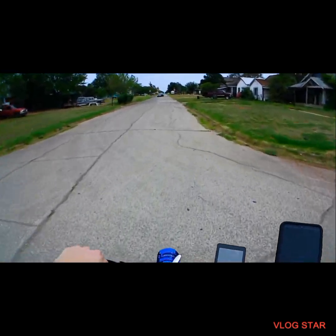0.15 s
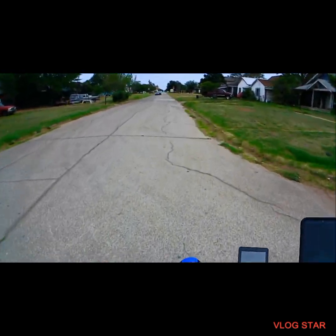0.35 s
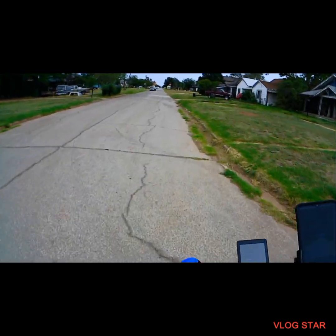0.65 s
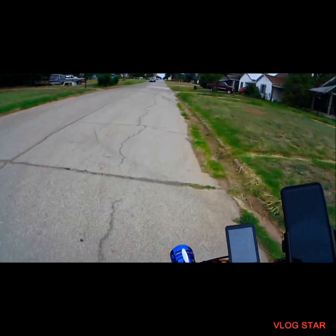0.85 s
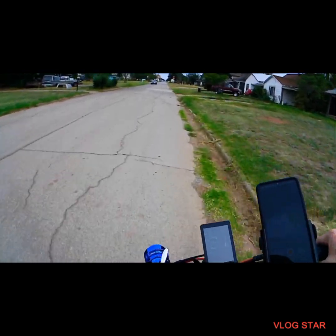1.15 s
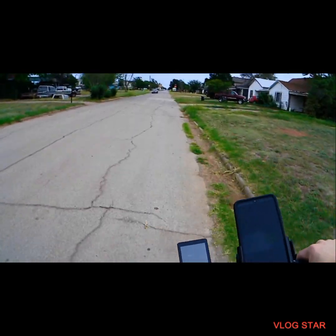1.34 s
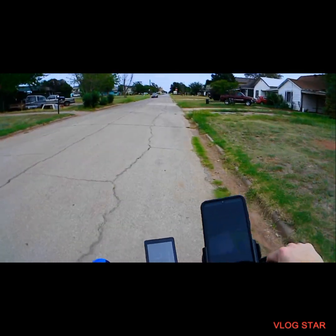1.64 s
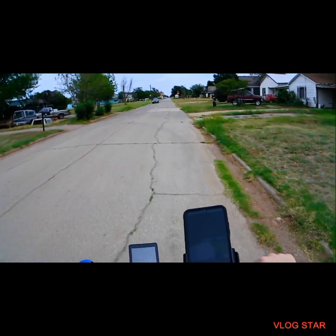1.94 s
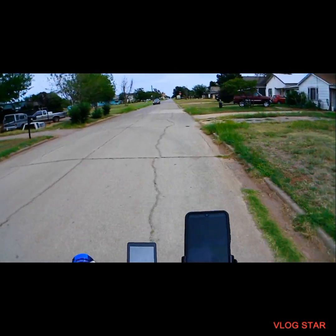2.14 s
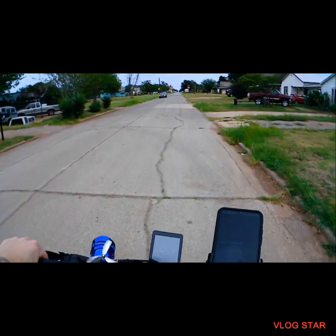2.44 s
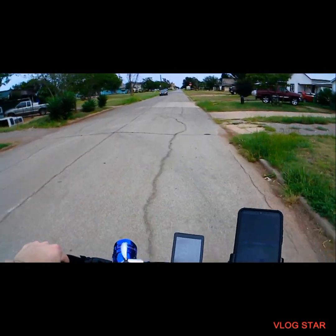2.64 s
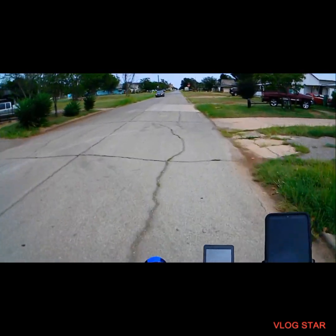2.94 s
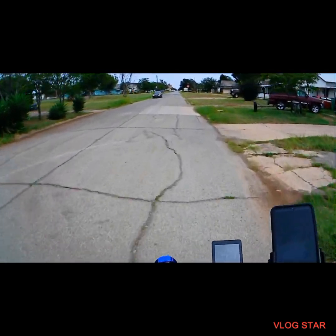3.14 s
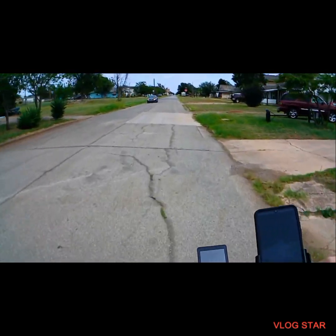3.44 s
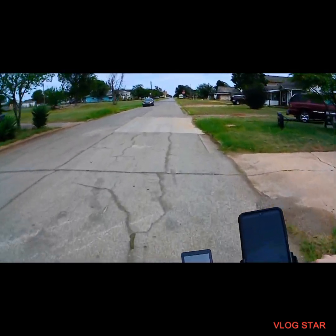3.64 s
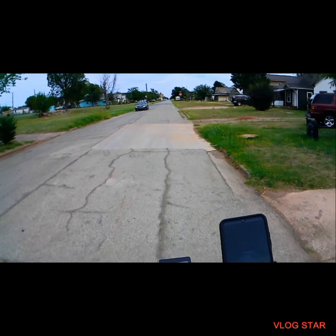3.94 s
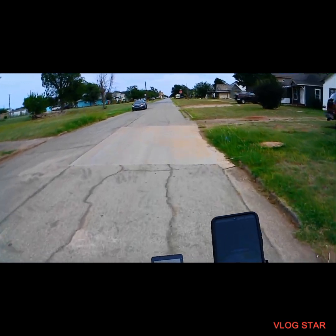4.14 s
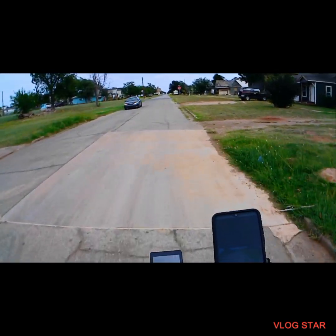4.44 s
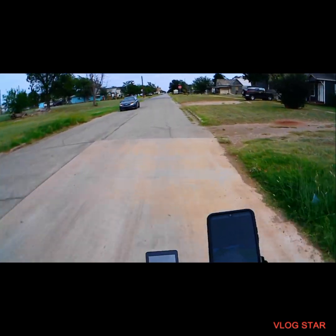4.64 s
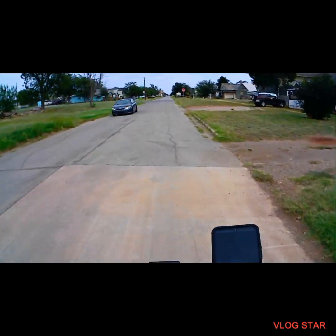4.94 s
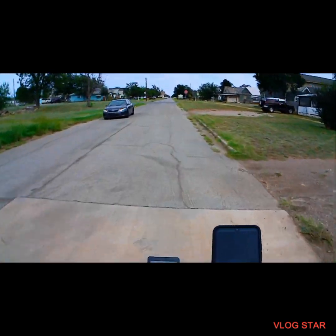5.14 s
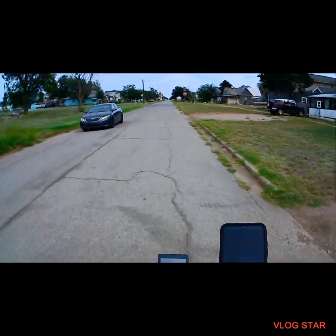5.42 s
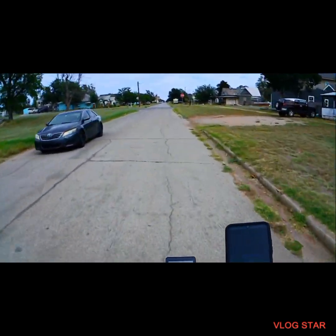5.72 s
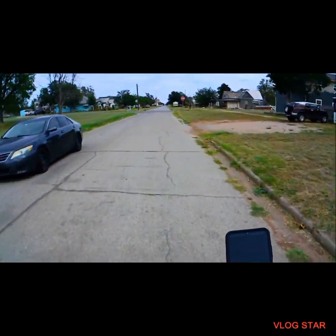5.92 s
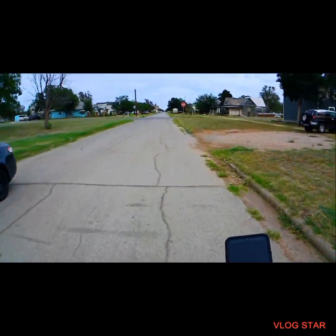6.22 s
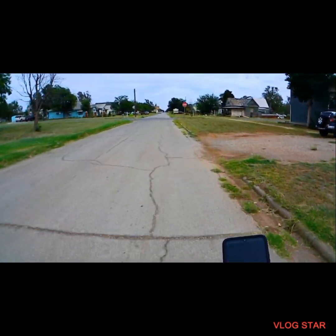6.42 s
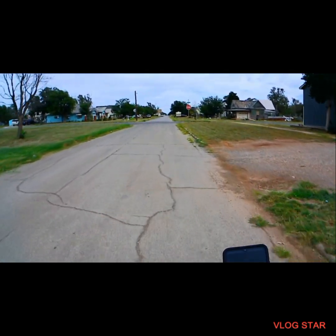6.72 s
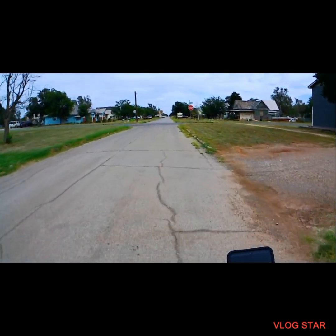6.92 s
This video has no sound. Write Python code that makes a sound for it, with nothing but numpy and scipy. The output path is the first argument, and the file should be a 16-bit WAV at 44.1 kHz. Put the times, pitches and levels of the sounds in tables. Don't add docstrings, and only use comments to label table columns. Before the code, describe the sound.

Close, mono outdoor sound from a rider's chest: an electric hub motor hums in a slowly rising mid-low tone under gusty, fluttering wind. Tyres roar and hiss over cracked concrete, with clusters of dull knocks around one second and again near six. Small grit ticks hit the frame, a loose part jingles faintly after four seconds, and a far bird gives short falling chips. An oncoming car's tyre noise blends in late, then drops away.

```python
import sys
import numpy as np
from scipy import signal
from scipy.fft import rfft, irfft, next_fast_len
from scipy.io import wavfile
from scipy.ndimage import uniform_filter1d, map_coordinates

SR = 44100
rng = np.random.default_rng(int(sys.argv[2]) if len(sys.argv) > 2 else 0)


def natural_amplitude(level_db):
    exponent = np.asarray(level_db, float) / 20
    return 10 ** exponent


def inscribe(sig):
    pcm = np.round(np.clip(np.atleast_2d(sig).T, -1, 1) * 32767)
    wavfile.write(sys.argv[1], SR, pcm.astype(np.int16))


N = 311787

# time in seconds, pitch in Hz, level in dB.
MOTOR_HUM = [(0, 334, -42), (.25, 336, -33.5), (.75, 337.8, -34), (1.25, 351.4, -33), (1.74, 361.5, -37),
             (2.02, 349, -33), (2.45, 370, -38), (2.9, 376, -38), (3.5, 371, -33), (3.82, 369.5, -27.5),
             (4.2, 376, -34), (4.42, 366.5, -33.5), (4.95, 377.5, -31.5), (5.8, 380.5, -35.5),
             (6.3, 386, -30.5), (6.6, 386, -36), (6.76, 389, -27), (7.07, 399.5, -26.5)]
# time in seconds, level in dB.
SIDE_ORDER = [(0, -48.5), (1.3, -43), (1.75, -41), (2, -46), (2.4, -41), (3, -40), (3.5, -41), (4, -44),
              (4.2, -38), (4.5, -45), (5, -38), (5.4, -43), (5.75, -35.5), (6.1, -40), (6.5, -44),
              (7.07, -44)]
# time in seconds, level in dB.
WHINE_LOAD = [(0, -50), (.35, -52), (.5, -66), (5.15, -62), (5.3, -51), (5.45, -62), (6.6, -58), (6.7, -46),
              (6.86, -44), (7.07, -44.5)]
# multiple of the hum's pitch, level in dB.
WHINE_ORDERS = [
    (3, -5),
    (4, -12),
    (4.5, 0),
]

# time in seconds, strength in dB.
HEAD_WIND = [(0, -39.5), (.4, -36), (.75, -32.5), (1.4, -32.5), (1.6, -35.5), (1.85, -36.5), (2.4, -35),
             (2.8, -33.5), (3.2, -30), (3.6, -30.5), (4.1, -29.5), (4.6, -28), (5.1, -30), (5.35, -29.5),
             (5.6, -29.5), (6.2, -29.5), (6.6, -25.5), (6.95, -33), (7.07, -25)]
# peak in seconds, half length in seconds, strength in dB, extra brightness in dB.
GUSTS = [(0.115, 0.26, 8, -1), (0.503, 0.037, 8, 2.5), (0.623, 0.069, 6, 1.5), (1.003, 0.14, 5.5, 3.5),
         (1.127, 0.09, 4.5, 9), (1.245, 0.075, 5, 5), (1.542, 0.043, -2, 8), (2.138, 0.21, 1.5, 6.5),
         (2.553, 0.19, 4, -4.5), (2.977, 0.11, 7.5, -0.5), (3.13, 0.041, 4.5, -0.5),
         (3.647, 0.048, 5.5, -1.5), (3.788, 0.068, 1.5, 5), (3.894, 0.22, 3, 4), (4.163, 0.052, 3, 3.5),
         (4.367, 0.12, 0.5, 3.5), (4.524, 0.048, 1.5, 3), (4.81, 0.1, 2.5, 1), (4.962, 0.086, 2.5, -1.5),
         (5.326, 0.1, 0, 5.5), (5.418, 0.069, 3.5, -1.5), (5.542, 0.084, 3.5, -3), (5.744, 0.03, 7, -8.5),
         (5.84, 0.21, 1.5, 3), (6.085, 0.13, 5.5, -1), (6.322, 0.084, 3, 4.5), (6.45, 0.12, 0, 6.5),
         (6.779, 0.037, 3, 1), (6.892, 0.058, 4, -6.5), (7.028, 0.1, 2, -4.5)]
# time in seconds, level of its upper part in dB.
UPPER_BUFFET = [(0, 0.5), (.3, 0.5), (.7, 0.5), (1.1, 2.5), (1.5, 0), (1.9, 1.5), (2.4, 1), (2.9, -1),
                (3.4, -0.5), (3.9, 1.5), (4.3, -3), (4.65, -3.5), (5.2, -1), (5.5, -1), (5.9, -0.5),
                (6.4, -1), (6.8, 0), (7.07, -5)]
# time in seconds, coarseness in dB.
COARSENESS = [(0, -6.5), (.4, -5), (.8, -2), (1.5, 0), (1.7, -5), (2.8, -4), (3.2, 2), (3.7, 1.5), (4.1, 5),
              (4.45, 1.5), (4.8, 7), (5.7, 6.5), (6.2, 4.5), (6.45, 3), (6.7, 1.5), (7.07, 0)]
# middle in seconds, half length in seconds, coarseness in dB.
ROUGH_PATCHES = [(.94, .05, 3), (1.23, .05, 1), (1.31, .03, 2.5), (3.66, .03, 3.5), (3.93, .07, 1),
                 (1.058, 0.13, 5.5), (1.5, .06, -2), (2.15, 0.071, 1), (3.012, .06, 3), (3.788, 0.036, 4),
                 (4.15, .1, 1.5), (4.302, 0.041, 4), (4.567, 0.13, 7), (4.766, 0.1, 3.5),
                 (5.259, 0.047, 4.5), (5.343, 0.051, 5), (5.737, 0.095, 5), (6.083, 0.028, 5),
                 (6.41, 0.093, 4), (7.07, 0.034, 6)]
# time in seconds, change of roar in dB.
TYRE_WEIGHT = [(0, -0.5), (.4, 1), (.8, 0), (1.1, 1.5), (1.4, -0.5), (1.6, 2), (1.9, -1), (2.4, 0), (3, 0),
               (3.6, 0), (4.2, 1), (4.8, 0), (5.4, 0), (6, 0), (6.5, 1), (6.72, -2.5), (6.9, -3.5),
               (7.07, -2)]

# frequency in Hz, density in dB per Hz.
BUFFET_COLOUR = [(12, -58), (20, -43), (48, -20), (145, -3), (278, -2), (338, -3.5), (386, -5), (468, -7.5),
                 (640, -20), (700, -20.5), (910, -29), (1540, -120)]
# frequency in Hz, density in dB per Hz.
RUSH_COLOUR = [(150, -41.5), (300, -5.5), (450, -2.5), (700, -3.5), (1000, -8.5), (1300, -20), (2000, -30),
               (4000, -63.5), (6000, -120)]
# frequency in Hz, density in dB per Hz.
SPRAY_COLOUR = [(1300, -36), (2000, -1), (2500, -2.5), (3100, -10), (4200, -14.5), (5000, -24), (6500, -32),
                (8000, -39.5), (10300, -53.5), (10600, -75)]
# frequency in Hz, density in dB per Hz.
ROAR_COLOUR = [(290, -39), (500, -2), (523, -16), (706, -11), (761, -8.5), (790, -3.5), (904, -3),
               (1130, -1.5), (1240, -2.5), (1780, -5.5), (2060, -15.5), (2240, -23), (3000, -32.5),
               (3900, -46.5), (6600, -120)]
# frequency in Hz, width in Hz, level in dB.
TYRE_MODES = [
    (1066, 160, -11),
    (1610, 210, -8),
]
# frequency in Hz, density in dB per Hz.
FLOOR_COLOUR = [(1500, -20), (2500, 2.5), (3500, -8.5), (4500, -10), (5500, -21.5), (7000, -20),
                (10350, -24), (10550, -46), (12500, -48), (16000, -60)]
# frequency in Hz, density in dB per Hz.
HISS_COLOUR = [(10300, -60), (10480, 0), (11000, -2), (11200, -60)]
# time in seconds, level in dB.
HISS_LEVEL = [(0, -90), (.28, -91), (.36, -84), (.46, -91), (.5, -130), (.68, -130), (.72, -90), (.8, -130),
              (1.28, -130), (1.34, -86), (2.9, -87), (3.12, -90), (3.16, -130), (7.07, -130)]

# frequency in Hz, width in Hz, level in dB.
JINGLE_MODES = [
    (8980, 90, 1.5),
    (9300, 600, 0),
    (10100, 900, -6.5),
]
# peak in seconds, half length in seconds, level in dB.
JOLTS = [
    (3.953, 0.37, -89),
    (4.235, 0.18, -74),
    (4.494, 0.13, -76.5),
    (4.8, 0.19, -75),
    (5.1, 0.22, -90),
    (6.302, .09, -76),
]
# start in seconds, peak in dB, ring in Hz.
CRACK_THUMPS = [(.081, -22, 490), (.589, -19, 330), (.644, -19, 627), (.9135, -20, 620), (.929, -18, 400),
                (1.031, -16, 484), (1.052, -17, 450), (1.068, -14, 400), (1.096, -16, 520),
                (1.121, -14, 420), (1.2, -16, 430), (1.241, -15, 430), (1.625, -26, 500), (2.938, -20, 455),
                (2.995, -19, 600), (3.762, -19, 440), (4.056, -20, 420), (5.535, -20, 480),
                (5.744, -20, 643), (5.9835, -14, 700), (6.059, -15, 330), (6.0812, -10, 640),
                (6.266, -19, 600), (6.543, -20, 668), (6.669, -17, 622), (2.958, -20, 875),
                (2.971, -19, 412), (3.853, -18, 412), (4.158, -19, 415), (5.682, -19, 482),
                (6.251, -19, 654), (6.456, -20, 554), (6.514, -18, 619), (6.785, -16, 482),
                (6.867, -23, 482), (6.893, -18, 495)]
# start in seconds, peak in dB, ring in Hz, rise in seconds, sharp edge in dB.
GRIT_TICKS = [(.8366, -37.5, 4000, .0004, -11), (2.5881, -52, 12200, .0003, -60),
              (2.5881, -52, 11200, .0003, -60), (4.255, -72, 11850, .002, -60),
              (2.5905, -47, 3600, .0006, -30), (.763, -29, 1700, .0012, -40), (1.04, -28, 1700, .0012, -40),
              (2.2232, -42, 4000, .0005, -30), (2.2742, -58, 4000, .0003, 5),
              (2.5881, -32, 3900, .00028, -4), (1.3758, -32, 2650, .0005, -30),
              (4.246, -29, 1850, .0018, -60), (4.3185, -19.5, 1780, .001, -70), (.63, -56, 4100, .0004, 0),
              (.7452, -48, 3800, .0004, -14), (1.8335, -50, 3400, .0004, -10),
              (1.972, -54, 4000, .0008, -20), (2.1185, -48, 3300, .0004, -14),
              (3.178, -49, 3500, .0004, -10), (3.8875, -52, 4600, .0004, -5),
              (3.9215, -53, 4600, .0004, -5), (4.057, -44, 3000, .0004, -12),
              (4.057, -50, 4700, .0008, -30), (5.244, -38, 2600, .0005, -20),
              (1.0605, -44, 3000, .0004, -14), (5.981, -44, 4200, .0004, -8), (6.079, -43, 3900, .0004, -8),
              (6.526, -63, 6200, .0005, -3), (6.613, -65, 6000, .0006, -6), (6.646, -64, 9600, .001, -20)]
# start in seconds, length in seconds, level in dB.
SAND_BURSTS = [(.62, .03, -71), (1.05, .03, -71), (2.928, .016, -60), (3.053, .014, -65),
               (4.205, .015, -70), (4.285, .015, -68), (4.68, .03, -72), (4.795, .06, -64), (5.8, .02, -70),
               (6.26, .07, -69), (6.515, .03, -70)]
# start in seconds, length in seconds, start pitch in Hz, end pitch in Hz, level in dB.
BIRD_CHIPS = [(1.005, .02, 4600, 4520, -58), (1.025, .014, 4600, 4520, -58), (1.131, .018, 4400, 4380, -54),
              (1.253, .024, 4470, 4300, -56), (1.358, .018, 3860, 3850, -59),
              (1.387, .012, 4680, 4600, -62), (1.398, .014, 4430, 4380, -58), (1.41, .012, 3850, 3800, -59),
              (1.488, 0.021, 3850, 3580, -56), (1.72, .015, 4470, 4470, -66),
              (3.935, 0.017, 4670, 4250, -54), (3.947, .011, 4100, 3950, -52),
              (3.956, .012, 3550, 3450, -56), (4.006, .019, 4400, 4230, -50),
              (4.02, 0.011, 3980, 3780, -55), (4.031, .009, 3600, 3450, -55),
              (4.037, 0.011, 3100, 3000, -53), (4.578, .026, 4900, 4880, -54),
              (4.603, .014, 4700, 4500, -54), (4.62, .012, 4200, 3900, -58), (4.703, .02, 4800, 4400, -62),
              (4.853, .014, 4800, 4800, -61), (4.9, .014, 4600, 4500, -56), (4.912, .016, 4390, 4250, -53)]


def unit(x):
    return x / np.sqrt(np.mean(x ** 2) + 1e-20)


def curves(rows):
    s, *columns = np.transpose(rows)
    return [np.interp(np.arange(N) / SR, s, column) for column in columns]


def wobble(rate):
    return map_coordinates(rng.standard_normal(N // 20), [np.arange(N) * min(rate, 2000) / SR])


def swells(s, half):
    return np.clip(1 - np.abs(np.arange(N) / SR - s[:, None]) / half[:, None], 0, 1)


def filtered(x, response):
    m = next_fast_len(N + 8192)
    return irfft(rfft(x, m) * response(np.fft.rfftfreq(m, 1 / SR)), m)[:N]


def below(x, hz):
    return filtered(x, lambda f: 1 / (1 + (f / hz) ** 6))


def resonance(f, centre, width):
    return 1j * f * width / (centre * centre - f * f + 1j * f * width)


def turbulence(colour, lumps, patchy_db):
    z = signal.stft(rng.standard_normal(N + 512), nperseg=512)[2]
    patches = uniform_filter1d(rng.standard_normal(z.shape), 5, 0)
    patches = unit(uniform_filter1d(patches, 10, 1))
    noise = signal.istft(z * natural_amplitude(patchy_db * patches), nperseg=512)[1][:N]
    hz, db = np.transpose(colour)
    return unit(filtered(noise * lumps, lambda f: natural_amplitude(np.interp(np.log(f + 1), np.log(hz), db))))


def ring(t, hz, rise):
    return t / rise * np.exp(1 - t / rise) * np.sin(2 * np.pi * hz * t)


def motor():
    hz, db = curves(MOTOR_HUM)
    phase = 2 * np.pi * np.cumsum(hz * (1 + .0014 * wobble(12))) / SR
    hum = natural_amplitude(db + .3 + 1.8 * wobble(16) + 1.3 * wobble(4)) * np.sin(phase)
    side = natural_amplitude(curves(SIDE_ORDER)[0] + 2.2 * wobble(6)) * np.sin(phase * 9 / 10)
    whine = np.zeros(N)
    for order, level in WHINE_ORDERS:
        whine += natural_amplitude(level + 1.2 * wobble(30)) * np.sin(order * phase + .95 * wobble(35))
    return np.sqrt(2) * (hum + side + natural_amplitude(curves(WHINE_LOAD)[0]) * whine)


def gusts():
    s, half, *rises = np.transpose(GUSTS)
    return rises @ swells(s, half)


def coarseness():
    s, half, patch_db = np.transpose(ROUGH_PATCHES)
    return curves(COARSENESS)[0] + patch_db @ swells(s, half)


def wind(gust_db, bright_db, gust, eddy, flick):
    wind_db = curves(HEAD_WIND)[0]
    buffet = turbulence(BUFFET_COLOUR, natural_amplitude(.59 * gust + .14 * eddy + .26 * flick), patchy_db=.3)
    large = below(buffet, 240)
    buffet = large + natural_amplitude(curves(UPPER_BUFFET)[0]) * (buffet - large)
    rush = turbulence(RUSH_COLOUR, natural_amplitude(.25 * gust + 1.0 * eddy + .63 * flick), patchy_db=-1.3)
    rush_db = -37 + 1.08 * (wind_db + 32) + 1.19 * gust_db + bright_db
    return natural_amplitude(wind_db + gust_db + 3) * buffet + natural_amplitude(rush_db) * rush


def tyre_spray(coarse_db, gust_db, bright_db, gust, eddy, flick):
    spray = turbulence(SPRAY_COLOUR, natural_amplitude(.2 * gust + .9 * wobble(70) + .5 * eddy + 2 * flick), patchy_db=1.2)
    dull = below(spray, 3800)
    spray = dull + natural_amplitude(.22 * (coarse_db - coarse_db.mean())) * (spray - dull)
    return natural_amplitude(-56.5 + .86 * coarse_db + .65 * gust_db + .53 * bright_db) * spray


def car_gain():
    abreast_s, approach_s, behind_s = 6.45, 1.5, .1
    late = np.arange(N) / SR - abreast_s
    return natural_amplitude(-42.5) / np.hypot(1, late / np.where(late < 0, approach_s, behind_s))


def tyre_roar(coarse_db, gust_db, bright_db, gust, eddy, flick):
    lumps = natural_amplitude(.25 * gust + 1.1 * eddy + 1.2 * flick + .6 * wobble(70))
    roar = turbulence(ROAR_COLOUR, lumps, patchy_db=.9)
    roar = unit(filtered(roar, lambda f: 1 + sum(natural_amplitude(db) * resonance(f, c, w) for c, w, db in TYRE_MODES)))
    roar_db = -36.5 + .3 * coarse_db + .2 * gust_db + .059 * bright_db + curves(TYRE_WEIGHT)[0]
    return np.hypot(natural_amplitude(roar_db), car_gain()) * roar


def loose_part():
    shakes = rng.standard_normal(N) * natural_amplitude(3 * wobble(60) + 3 * wobble(300))
    jingle = unit(filtered(shakes, lambda f: sum(natural_amplitude(db) * resonance(f, c, w) ** 2 for c, w, db in JINGLE_MODES)))
    s, half, jolt_db = np.transpose(JOLTS)
    return (natural_amplitude(-92.5) + natural_amplitude(jolt_db) @ swells(s, half)) * jingle


def air_and_road():
    gust_db, bright_db = gusts()
    coarse_db = coarseness()
    eddies = wobble(14), wobble(70), wobble(400)
    heard = wind(gust_db, bright_db, *eddies)
    heard += tyre_spray(coarse_db, gust_db, bright_db, *eddies)
    heard += tyre_roar(coarse_db, gust_db, bright_db, *eddies)
    heard += loose_part()
    heard += natural_amplitude(-62) * turbulence(FLOOR_COLOUR, 1, patchy_db=.6)
    hiss = natural_amplitude(curves(HISS_LEVEL)[0]) * turbulence(HISS_COLOUR, 1, patchy_db=5)
    return filtered(heard, lambda f: f < 10480) + hiss


def crack_thumps():
    out, t = np.zeros(N + SR), np.arange(900) / SR
    for s, db, hz in CRACK_THUMPS:
        out[round(s * SR):][:900] += natural_amplitude(db - 2.5) * ring(t, hz, .001)
    return out[:N]


def sand():
    level = np.zeros(N)
    for s, length, db in SAND_BURSTS:
        n = round(length * SR)
        level[round(s * SR):][:n] = natural_amplitude(db) * np.hanning(n) ** .37
    grains = unit(rng.standard_normal(N) * natural_amplitude(4 * wobble(500)))
    return filtered(level * grains,
                    lambda f: 2 / (1 + (6300 / (f + 1)) ** 12) / (1 + (f / 9000) ** 4) * (f < 11000))


def grit_ticks():
    out, t = np.zeros(N + SR), np.arange(900) / SR
    edge = .5 * ring(t, 6000, .00018) - .2 * ring(t, 7600, .00018) - .55 * ring(t, 4950, .00025)
    touch = .39 * edge + .26 * ring(t, 5600, .0005)
    rebound_s, rebound_db = .0018, -8
    for s, db, hz, rise, edge_db in GRIT_TICKS:
        out[round(s * SR):][:900] += natural_amplitude(db) * (ring(t, hz, rise) + natural_amplitude(edge_db) * edge)
        out[round((s + rebound_s) * SR):][:900] += natural_amplitude(db + rebound_db + edge_db) * touch
    return out[:N]


def bird():
    out = np.zeros(N)
    for s, length, hz0, hz1, db in BIRD_CHIPS:
        n = round(length * SR)
        glide = np.cumsum(np.linspace(hz0, hz1, n)) / SR
        out[round(s * SR):][:n] += natural_amplitude(db + .5) * np.hanning(n) ** .67 * np.sin(2 * np.pi * glide)
    echo_s, echo_db = .013, -8
    return out + natural_amplitude(echo_db) * np.roll(out, round(echo_s * SR))


def scene():
    contacts = crack_thumps() + sand() + grit_ticks()
    return (motor() + air_and_road() + contacts + bird())[None]


def top_cut(x):
    return signal.sosfilt(signal.butter(12, 12600, fs=SR, output="sos"), x)


def record(dry):
    return top_cut(dry)


dry = scene()
out = record(dry)
inscribe(out)
```